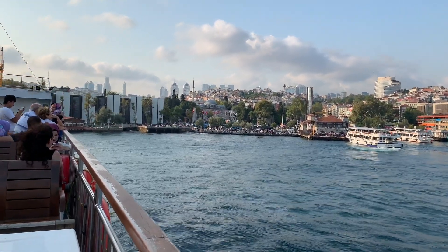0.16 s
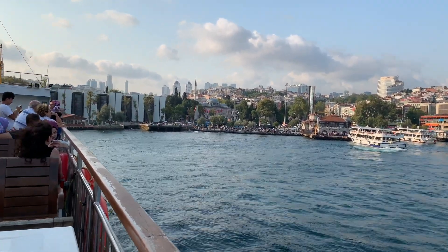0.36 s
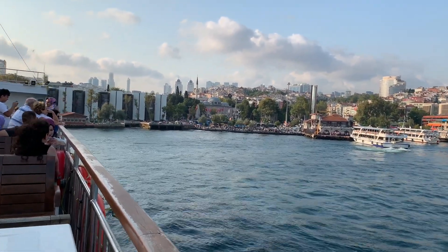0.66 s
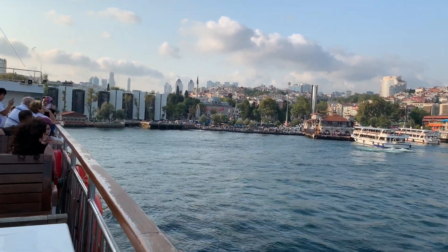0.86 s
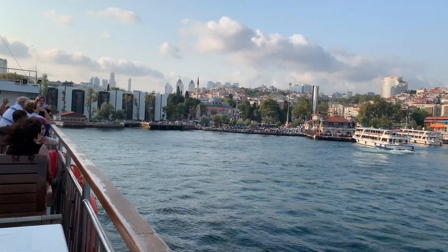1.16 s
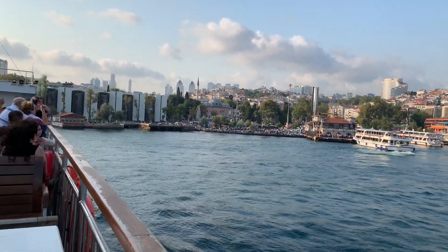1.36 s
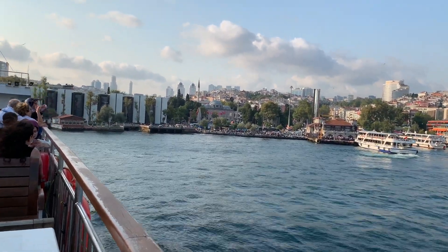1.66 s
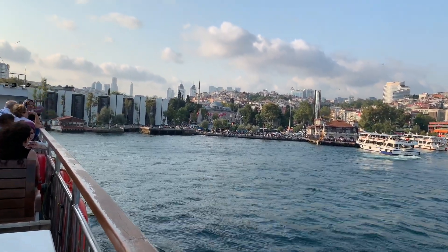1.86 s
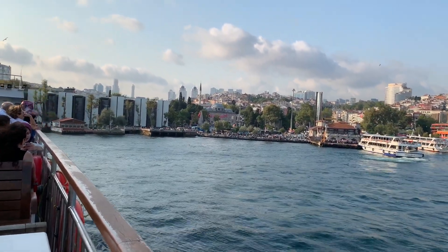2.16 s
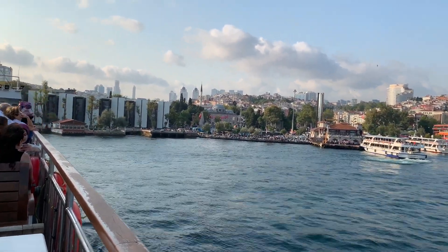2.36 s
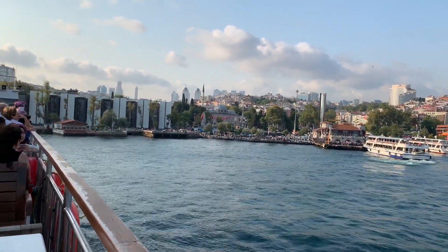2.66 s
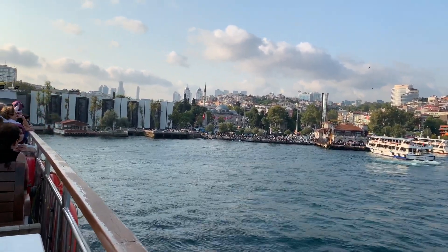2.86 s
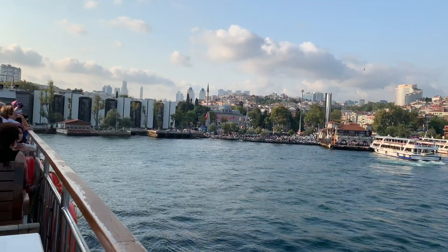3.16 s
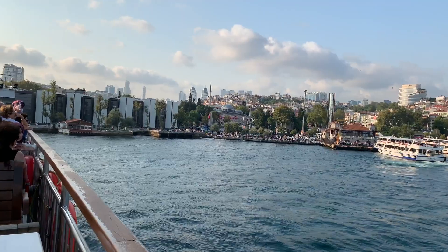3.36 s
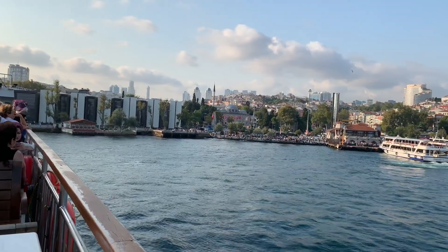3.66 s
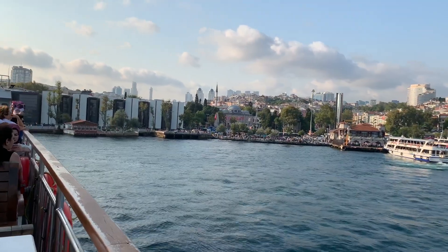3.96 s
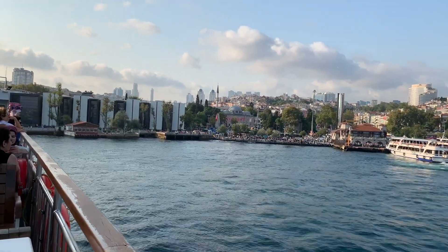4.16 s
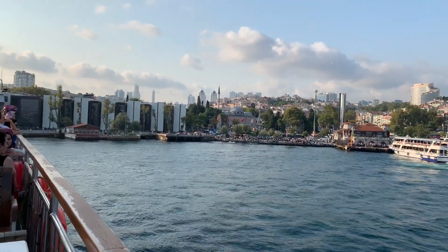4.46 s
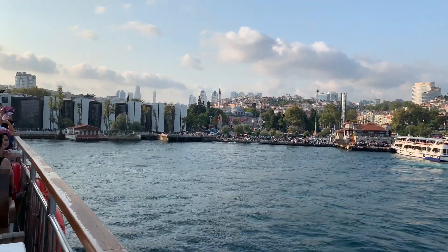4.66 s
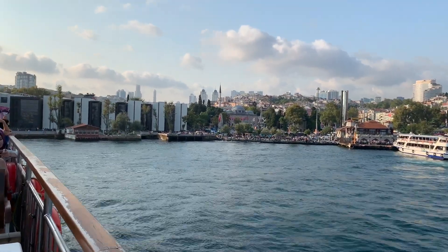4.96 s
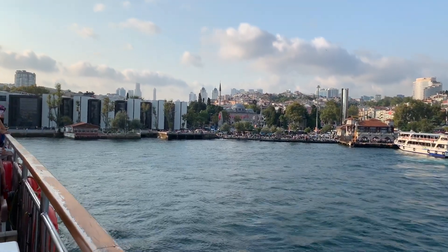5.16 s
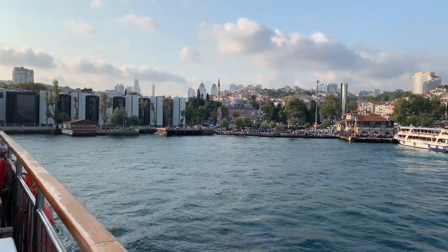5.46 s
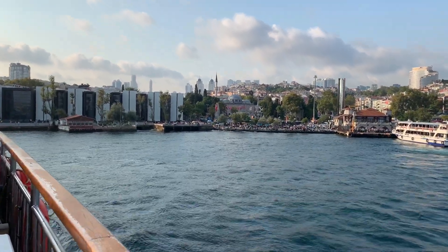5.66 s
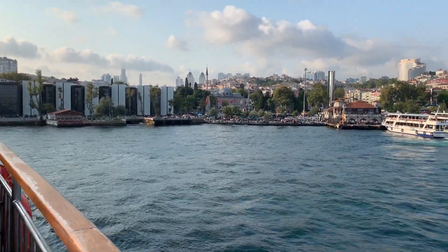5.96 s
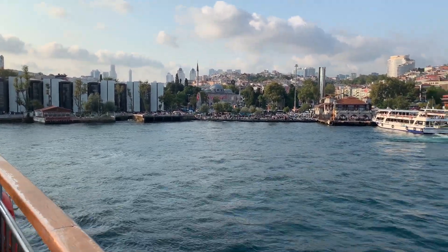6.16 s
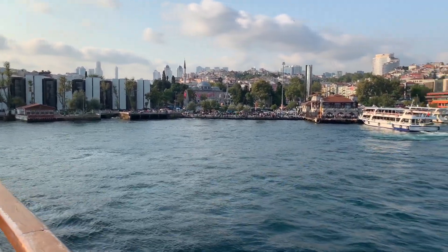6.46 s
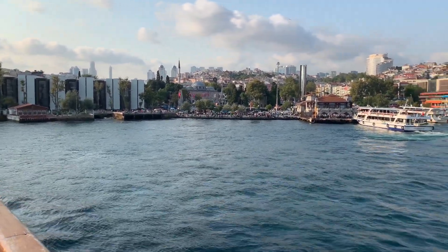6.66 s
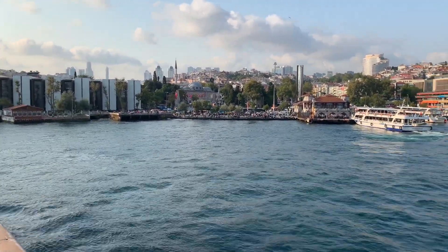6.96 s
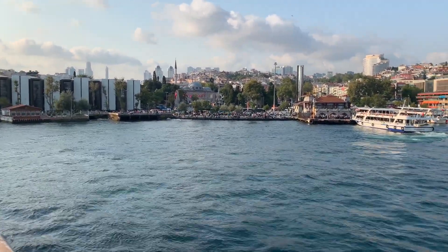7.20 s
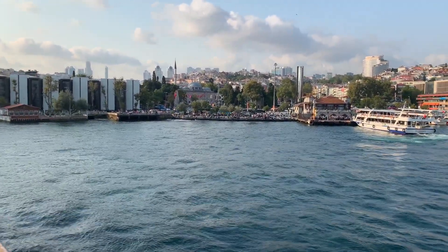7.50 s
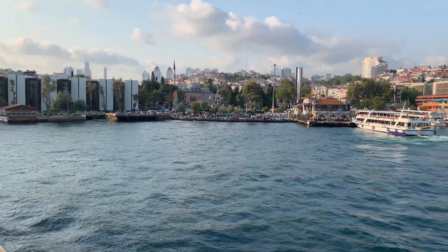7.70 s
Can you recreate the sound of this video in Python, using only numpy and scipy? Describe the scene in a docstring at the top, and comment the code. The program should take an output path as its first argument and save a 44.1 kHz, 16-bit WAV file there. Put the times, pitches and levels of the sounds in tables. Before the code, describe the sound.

Close, boomy wind roar dominates, rushing in irregular bursts that flatten into overload. It starts dense and loud, eases around the middle, and keeps returning in separate thumps to the end. A steady low engine hum and water wash lie underneath, with soft airy hiss above. Dry snaps and sharp little clicks scatter throughout; a very faint high whistle appears midway, and a tiny squeal near the end.

```python
"""Wind buffets a phone microphone on the open deck of a moving ferry.
From the start, turbulence carried past the port flaps louder and brighter with speed; hard gusts overload it.
Under it an engine tone drones over filtered hull noise, machinery tones whine and shaped noise hisses as spray.
Short noise bursts soon snap at the port, and single-sample digital clicks tick on an even beat.
At about 3 s a faint whistle, a sine of drifting pitch, starts to rise; near the end another sine squeals."""
import sys
import numpy as np
from scipy import signal
from scipy.fft import rfft, irfft, next_fast_len
from scipy.io import wavfile
from scipy.ndimage import uniform_filter1d, map_coordinates

SR = 44100
rng = np.random.default_rng(int(sys.argv[2]) if len(sys.argv) > 2 else 0)


def store_pcm(level_fs):
    """Save levels as 16-bit WAV."""
    pcm = np.round(np.clip(level_fs, -1, 1) * 32767).astype(np.int16)
    wavfile.write(sys.argv[1], SR, np.atleast_2d(pcm).T)


N = 345402
T = np.arange(N) / SR  # time [s]


def undb(db):
    """Logarithmic level: 20 dB is a factor of ten in amplitude."""
    return 10 ** (np.asarray(db) / 20)


def curves(table):
    """Linear interpolation: each column of a timed table, sample by sample."""
    s, *columns = np.transpose(table)
    return [np.interp(T, s, column) for column in columns]


def noise(spectrum, size=N):
    """Spectral shaping: white noise weighted by (frequency [Hz], relative density [dB]), rms 1."""
    length = next_fast_len(size)
    hz, db = np.transpose(spectrum)
    bins = np.maximum(np.fft.rfftfreq(length, 1 / SR), 1)
    weight = undb(np.interp(np.log(bins), np.log(hz), db))
    white = rng.standard_normal(length)
    x = irfft(rfft(white) * weight, length)[:size]
    return x / x.std()


def walk(rate):
    """Band-limited chance: a smooth random curve of spread 1, moving up to about `rate` [Hz]."""
    length = next_fast_len(N)
    bins = np.fft.rfftfreq(length, 1 / SR)
    white = rng.standard_normal(length)
    x = irfft(rfft(white) * np.exp(-.5 * (bins / rate) ** 2), length)[:N]
    return x / x.std()


def lowpass(x, hz):
    """Second-order treble cut."""
    return signal.sosfilt(signal.butter(2, hz, fs=SR, output="sos"), x)


def highpass(x, hz):
    """Second-order bass cut."""
    return signal.sosfilt(signal.butter(2, hz, "high", fs=SR, output="sos"), x)


def tone(hz, db, blur, rate):
    """Phase modulation: a random phase of spread `blur` [rad] widens a sine of given pitch and rms level."""
    phase = 2 * np.pi * np.cumsum(hz * np.ones(N)) / SR + blur * walk(rate)
    return np.sqrt(2) * undb(db) * np.sin(phase)


def swells(rest_db, table, attack_s, release_s):
    """Trapezoidal envelope: the level leaves rest by attack, hold and release; the highest swell prevails."""
    db = rest_db
    for start, length, top_db in table:
        corners = [start - attack_s, start, start + length, start + length + release_s]
        share = np.interp(T, corners, [0, 1, 1, 0])
        db = np.maximum(db, rest_db + share * (top_db - rest_db))
    return db


def shedding(per_s, decay_s, rise_hz=900):
    """Shot noise: random eddies arrive suddenly and decay; mean 0, spread near 1, rare giants held back."""
    kicks = (rng.random(N) < per_s / SR) * rng.random(N)
    x = signal.lfilter([1], [1, -np.exp(-1 / (decay_s * SR))], kicks - kicks.mean())
    x = lowpass(x, rise_hz)
    return 3 * np.tanh(x / x.std() / 3)


# breeze between gusts: (time [s], level [dB], speed [ratio to mean])
BREEZE_CURVE = [(0, -19, 1.165), (1.0, -21, 0.98), (1.75, -21, 0.99), (2.2, -20, 1.125), (2.7, -23.5, 1.06),
                (3.35, -24, 0.94), (4.3, -26.5, .96), (4.6, -29.5, 1.042), (5.2, -25, .85),
                (5.55, -25, 1.06), (6.0, -30.5, 0.97), (7.2, -25, .9), (7.83, -23, .96)]
# gusts rising out of the breeze: (start [s], length [s], level [dB])
GUST_SWELLS = [(0.0, 0.33, -13), (0.422, .13, -16.5), (0.621, .11, -16), (0.829, 0.49, -18.5),
               (1.423, .28, -18), (1.97, .2, -17), (2.411, .13, -16), (2.78, 0.47, -21), (3.449, .37, -24),
               (4.002, .14, -23.5), (4.75, .24, -22.5), (5.33, 0.29, -19.5), (5.759, .11, -16.5),
               (6.069, .2, -24), (6.351, 0.26, -20.5), (6.679, .24, -22), (7.052, 0.072, -21),
               (7.39, .44, -21.5)]
# strongest single eddies: (time [s], level [dB], speed [ratio to mean])
STRONG_EDDIES = [(0.024, -7.5, 1.85), (0.084, -5.5, 1.0), (0.138, -9.5, 1.52), (0.177, -6.5, 1.44),
                 (0.235, -12.5, 1.08), (0.312, -9, 1.41), (0.425, -4.5, 1.43), (0.53, -11.5, 1.62),
                 (0.666, -14.5, 1.69), (0.696, -5, 1.42), (0.83, -10.5, 1), (0.958, -7.5, 1.31),
                 (1.008, -11, 0.86), (1.133, -13.5, 1.61), (1.163, -8.5, 0.67), (1.283, -5.5, 1.28),
                 (1.674, -12, 1.2), (2.025, -8.5, 2.38), (2.112, -22, 1.72), (2.16, -15, 0.84),
                 (2.455, -5.5, 1.06), (2.802, -10, 1.665), (2.907, -15.5, 1.86), (3.218, -13.5, 1.32),
                 (3.446, -12.5, 1.31), (3.515, -13, 1.69), (3.554, -8, 1.19), (3.613, -10, 1.39),
                 (3.698, -9, 1.58), (3.921, -14, 2.46), (4.012, -14.5, 0.88), (4.113, -14.5, 1.23),
                 (4.385, -16, 0.94), (4.784, -11.5, 1.1), (4.839, -17.5, 1.04), (4.933, -11.5, 0.99),
                 (5.018, -15.5, 0.95), (5.413, -9.5, 1.24), (5.534, -9, 1.33), (5.616, -14.5, 1.25),
                 (5.847, -18, 1.08), (5.944, -10.5, 1.08), (6.213, -11, 1.3), (6.362, -14, 1.455),
                 (6.429, -12.5, 1.06), (6.492, -6, 0.99), (6.536, -9, 1.48), (6.722, -14, 1.37),
                 (6.785, -12, 1.53), (6.885, -13, 1.85), (7.019, -13.5, 1.315), (7.327, -13.5, 0.78),
                 (7.435, -9, 1.22), (7.779, -6.5, 1.03), (7.817, -13, 1.45)]
GUST_ATTACK_S, GUST_RELEASE_S = .03, .05
DB_PER_SPEED_DOUBLING = 42
BUFFET_RISE_S, BUFFET_FALL_S = .0034, .0056  # Gaussian spreads


def airflow(flutter_db=2.5, flutter_speed=.13):
    """Coupled level and speed: louder gusts run faster, both flutter, and each strong eddy takes over briefly."""
    breeze_db, breeze_speed = curves(BREEZE_CURVE)
    db = swells(breeze_db, GUST_SWELLS, GUST_ATTACK_S, GUST_RELEASE_S)
    speed = breeze_speed * 2 ** ((db - breeze_db) / DB_PER_SPEED_DOUBLING)
    flutter = shedding(per_s=170, decay_s=.005, rise_hz=300.8)
    db = db + flutter_db * flutter
    speed = speed * np.exp(flutter_speed * flutter)
    for s, peak_db, peak_speed in STRONG_EDDIES:
        first = max(int((s - 4 * BUFFET_RISE_S) * SR), 0)
        near = slice(first, int((s + 4 * BUFFET_FALL_S) * SR))
        age = T[near] - s
        spread = np.where(age < 0, BUFFET_RISE_S, BUFFET_FALL_S)
        share = np.exp(-.5 * (age / spread) ** 2)
        db[near] += share * (peak_db - db[near])
        speed[near] += share * (peak_speed - speed[near])
    return db, speed


# turbulent pressure at mean speed: (frequency [Hz], relative density [dB per Hz])
TURBULENCE_SPECTRUM = [(15, -1.5), (30, 2.5), (60, -0.5), (110, 2), (200, -0.5), (320, -6), (500, -11.5),
                       (800, -20.5), (1300, -30.5), (2200, -43), (4000, -56.5), (9000, -74)]


def wind(db, speed, swirl_speed=.23, swirl_db=1.54):
    """Frozen turbulence: a fixed field is carried past the port, and faster air raises its frequencies."""
    # small swirls ride on the large ones and steepen their edges
    swirl = shedding(per_s=450, decay_s=.0015)
    travel = np.cumsum(speed * np.exp(swirl_speed * swirl))
    field = noise(TURBULENCE_SPECTRUM, size=2 * N)
    pressure = map_coordinates(field, [travel], order=3, mode="mirror")
    return pressure * undb(db + swirl_db * swirl)


# hull rumble and wash: (frequency [Hz], relative density [dB per Hz])
RUMBLE_SPECTRUM = [(12, -31), (24, -4), (50, -1.5), (90, -1.5), (150, -5.5), (300, -19.5), (600, -32),
                   (1100, -32.5), (1750, -44), (2100, -38.5), (2900, -51), (3800, -51.5), (6000, -77),
                   (12000, -75)]
ENGINE_HZ = 75.2


def engine(air_db, drone_db=-28.5, wander=0.67, deep_db=-23.5, wash_db=-26, surge=0.36):
    """Tone over broadband noise: a firing tone of wandering phase drones above the rumble of hull and wash."""
    drone = tone(ENGINE_HZ, drone_db, blur=wander, rate=2.1)
    # the deep part surges with the wind, averaged over 40 ms; the wash stays even
    gust_db = uniform_filter1d(air_db - air_db.mean(), size=SR // 25)
    deep = lowpass(noise(RUMBLE_SPECTRUM), 200)
    wash = highpass(noise(RUMBLE_SPECTRUM), 217)
    return drone + deep * undb(deep_db + surge * gust_db) + wash * undb(wash_db)


# clear machinery whine: (time [s], level [dB])
WHINE_LEVEL = [(0, -61), (2, -60), (4, -58), (4.7, -64), (5.3, -67), (6, -59), (7.8, -68)]
WHINE_HZ = 2498


def machinery():
    """Line broadening: phase wander leaves one whine fairly clear and spreads the lower one into a blur."""
    whine_db, = curves(WHINE_LEVEL)
    clear = tone(WHINE_HZ, whine_db, blur=0.74, rate=8.9)
    blurred = tone(hz=2060, db=-65.5, blur=2.0, rate=14.1)
    return clear + blurred


# hiss between swells: (time [s], level [dB])
CALM_LEVEL = [(0, -59), (1.6, -61), (2.8, -64), (4.1, -62.5), (5.6, -59), (7.83, -63.5)]
# swells of spray along the hull: (start [s], length [s], level [dB])
SPRAY_SWELLS = [(0.0, 0.39, -57.5), (.7, 0.2, -55), (1.93, .1, -55.5), (2.35, .15, -58),
                (4.3, 0.094, -57.8), (4.651, 0.36, -60.5), (5.199, 0.087, -56), (5.95, 0.54, -57.3),
                (7.25, 0.47, -59)]
# spray: (frequency [Hz], relative density [dB per Hz])
SPRAY_SPECTRUM = [(1000, 5), (4000, -1.5), (7000, 2), (11000, 3.5), (15500, 1), (16200, -19)]
SPRAY_ATTACK_S, SPRAY_RELEASE_S = 0.2, 0.18


def hiss():
    """Amplitude-modulated noise: a smooth, thin hiss swells with each wash of spray."""
    calm_db, = curves(CALM_LEVEL)
    level_db = swells(calm_db, SPRAY_SWELLS, SPRAY_ATTACK_S, SPRAY_RELEASE_S)
    return noise(SPRAY_SPECTRUM) * undb(level_db)


# loudest snaps of air tearing off the port's edge: (time [s], level [dB])
LOUD_SNAPS = [(0.2868, -25), (0.531, -24), (0.5434, -16), (0.664, -22), (0.6749, -12), (0.6944, -20),
              (1.2965, -23), (2.025, -20), (2.1153, -17), (2.2183, -19), (2.9068, -12.5), (3.1356, -23.5),
              (3.4468, -27), (3.5181, -20.5), (3.6205, -19), (3.7713, -21), (3.9215, -20), (4.855, -28),
              (6.212, -26), (6.535, -27), (6.8853, -25), (6.9019, -21.5), (7.4376, -26)]
# torn flow: (frequency [Hz], relative density [dB per Hz])
TEARING_SPECTRUM = [(300, -1), (900, 3.5), (2000, -2), (4000, -10), (7000, -22.5), (12000, -31)]
# random lesser snaps; their level is relative to that of the air
CRACKLE_PER_S, CRACKLE_DB, CRACKLE_SPREAD_DB, CRACKLE_SPEED_POWER = 28, -19.5, 5.5, 0.84


def snaps(air_db, speed, rise_s=0.00042, decay_s=0.00073):
    """Flow separation: air tears off the port's edge in noise bursts; the random ones grow with the air's speed."""
    at = np.flatnonzero(rng.random(N) < CRACKLE_PER_S / SR)
    crackle_db = CRACKLE_DB + air_db + CRACKLE_SPREAD_DB * rng.standard_normal(N)
    crackle_db += CRACKLE_SPEED_POWER * 20 * np.log10(speed)
    envelope = np.zeros(N)
    for s, db in list(LOUD_SNAPS) + list(zip(T[at], crackle_db[at])):
        near = slice(max(int((s - 10 * rise_s) * SR), 0), int((s + 10 * decay_s) * SR))
        age = T[near] - s
        envelope[near] += undb(db) * np.exp(-np.maximum(-age / rise_s, age / decay_s))
    return envelope * noise(TEARING_SPECTRUM)


# loudest ticks: single-sample digital clicks, each set on the nearest beat: (time [s], impulse level [dB])
LOUD_TICKS = [(0.283, -6.5), (0.484, -17), (0.784, -15.5), (0.851, -15), (1.285, -18), (1.552, -12.5),
              (1.619, -15.5), (2.052, -14), (2.553, -15.5), (2.62, -18), (2.687, -13.5), (2.987, -18),
              (3.12, -19), (3.187, -11.5), (3.487, -12), (3.555, -11), (3.621, -11.5), (3.822, -18),
              (4.388, -18), (4.689, -17), (4.756, -17.5), (4.889, -20), (4.956, -17.5), (5.256, -21.5),
              (5.39, -14.5), (5.457, -17), (5.824, -15), (6.325, -15), (6.391, -17.5), (6.458, -15),
              (6.591, -13.5), (6.825, -15), (6.959, -16), (7.159, -19), (7.459, -17), (7.726, -6.5)]
TICK_BEAT_HZ, FIRST_BEAT_S = 29.96, .0164
FAINT_TICK_SHARE, FAINT_TICK_DB, FAINT_TICK_SPREAD_DB = .12, -26, 2


def ticks():
    """Impulse train: single-sample digital clicks fall on a fast, even beat, most of which stays silent."""
    beats = np.arange(FIRST_BEAT_S, N / SR, 1 / TICK_BEAT_HZ)
    sounds = rng.random(len(beats)) < FAINT_TICK_SHARE
    faint_db = FAINT_TICK_DB + FAINT_TICK_SPREAD_DB * rng.standard_normal(len(beats))
    size = sounds * undb(faint_db)
    for s, db in LOUD_TICKS:
        size[np.argmin(abs(beats - s))] = undb(db)
    out = np.zeros(N)
    out[(beats * SR).astype(int)] = size
    return out


# faint high whistle: (time [s], pitch [Hz], level [dB])
WHISTLE_CURVE = [(3.2, 9450, -88), (3.45, 9830, -79), (3.9, 10220, -69), (4.5, 10450, -81),
                 (5.2, 10530, -72), (5.7, 10500, -79), (6.7, 10460, -74), (7.1, 10400, -90)]


def whistle():
    """Frequency glide: a faint sine of blurred phase rises in pitch and settles."""
    return tone(*curves(WHISTLE_CURVE), blur=1.1, rate=19)


# brief faint squeal: (time [s], pitch [Hz], level [dB])
SQUEAL_CURVE = [(7.62, 5413, -110), (7.68, 5385, -65), (7.78, 5363, -67), (7.83, 5386, -76)]


def squeal():
    """Gated tone: a sine of slightly drifting pitch is raised briefly from near silence."""
    return tone(*curves(SQUEAL_CURVE), blur=0.75, rate=30.5)


CEILING = .5  # largest amplitude the microphone follows


def overload(x):
    """Saturation: the microphone follows the pressure up to its ceiling, then flattens with a short knee."""
    return x / (1 + (x / CEILING) ** 10) ** (1 / 10)


def scene():
    """Superposition before saturation: wind and engine overload together; ticks oppose the pressure's sign."""
    air_db, speed = airflow()
    pressure = wind(air_db, speed) + snaps(air_db, speed) + engine(air_db)
    pressure += machinery() + whistle() + squeal()
    air = overload(highpass(pressure, 17.5))
    return (air + hiss() - np.sign(air) * ticks())[None]


TOP_HZ = 16300


def record(dry):
    """Band limitation: a steep elliptic low-pass cuts the top."""
    return signal.sosfilt(signal.ellip(8, .2, 70, TOP_HZ, fs=SR, output="sos"), dry)


dry = scene()
out = record(dry)
store_pcm(out)
```